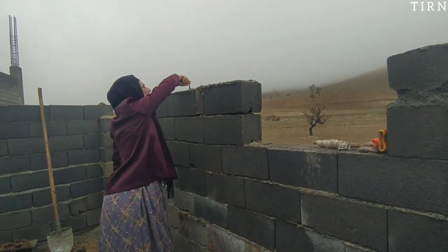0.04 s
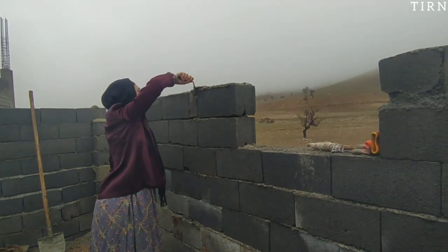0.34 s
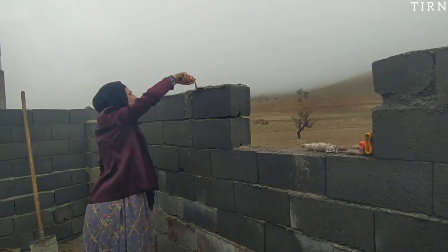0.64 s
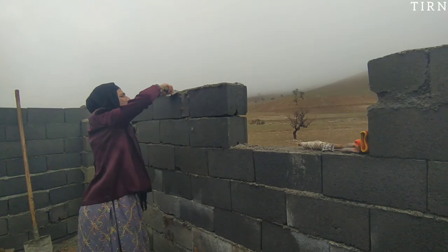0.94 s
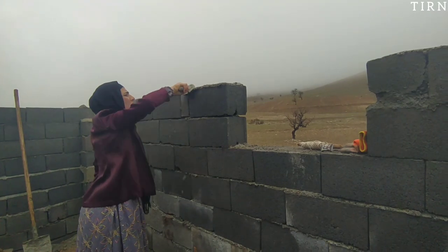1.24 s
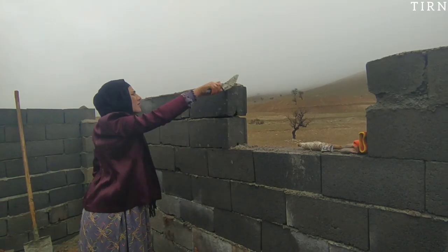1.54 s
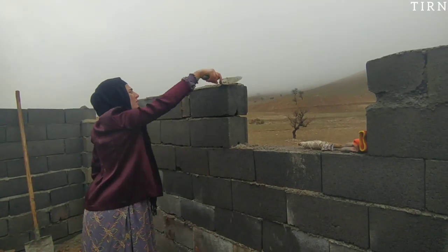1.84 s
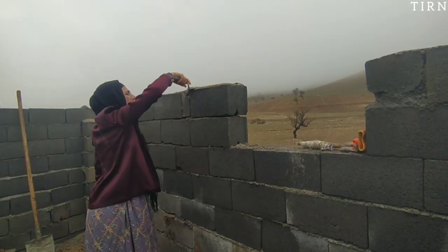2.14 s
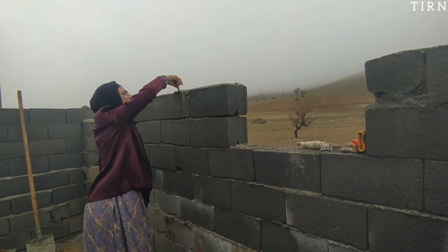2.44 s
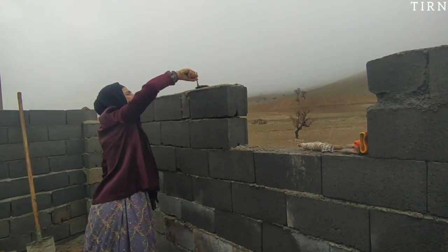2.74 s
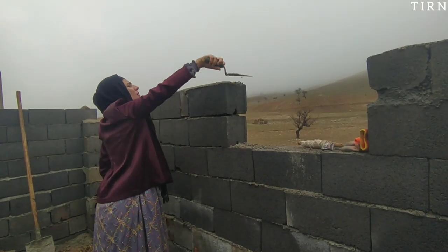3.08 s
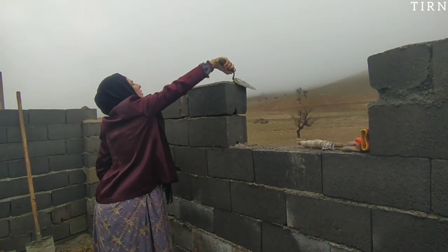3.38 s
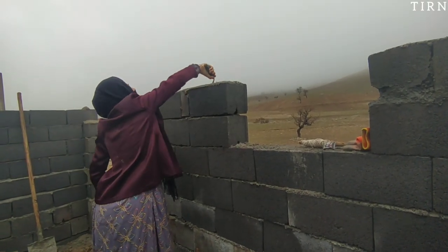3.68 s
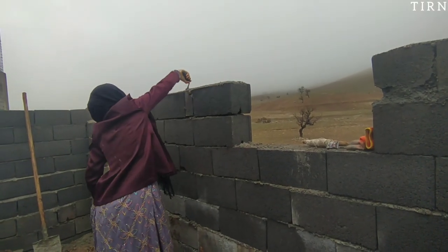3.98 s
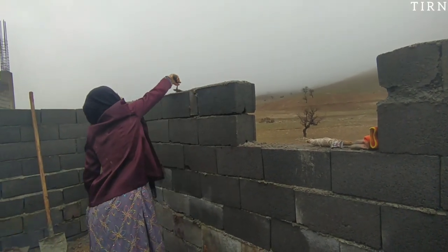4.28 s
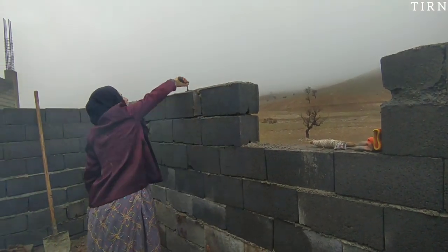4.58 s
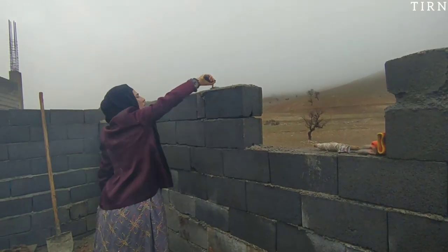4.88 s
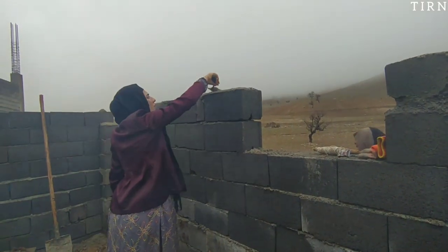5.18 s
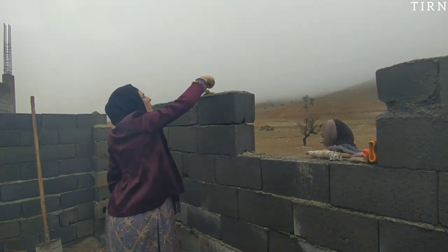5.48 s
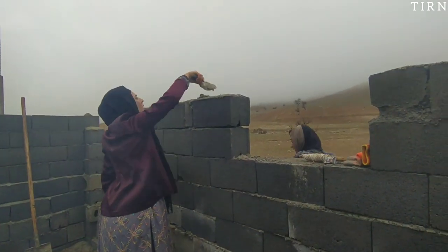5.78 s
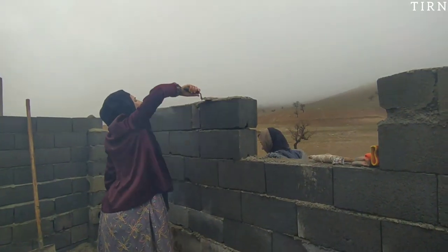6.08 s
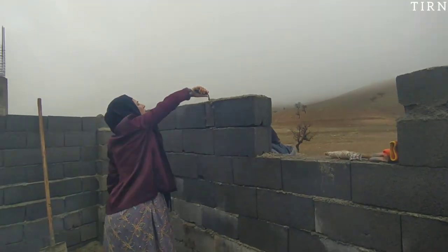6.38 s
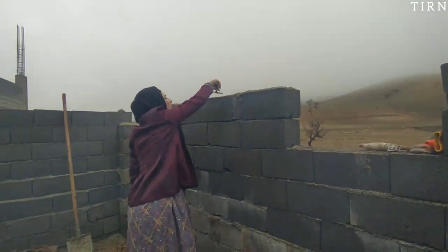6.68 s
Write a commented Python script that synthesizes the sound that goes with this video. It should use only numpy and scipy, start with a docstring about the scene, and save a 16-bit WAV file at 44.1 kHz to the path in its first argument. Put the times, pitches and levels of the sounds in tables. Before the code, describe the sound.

A steel trowel spreads sandy mortar along a hollow concrete block wall in short, hissing strokes. After about a second the blade hits bare block, rasping, catching and ringing as grit cracks. Mostly gentler strokes follow, a lump of mortar patters softly down, and the scraping resumes. The trowel sits to the left, with a brief wall echo, over faint open air and a distant engine.

```python
"""A far engine drones while a steel trowel starts to spread sandy mortar along a hollow concrete block wall.
Sand hisses under the blade, and the unroofed walls echo briefly. After about a second the blade bears
on bare block: it rasps, catches and rings, grit cracks, and the block grinds below.
Mostly gentler strokes follow. Just past five seconds a lump of mortar patters to the ground,
and a few more strokes end the scene."""
import sys
import numpy as np
from scipy import signal
from scipy.fft import rfft, irfft, next_fast_len
from scipy.io import wavfile
from scipy.ndimage import map_coordinates

SR = 44100
rng = np.random.default_rng(int(sys.argv[2]) if len(sys.argv) > 2 else 0)


def to_wav(sig):
    """Store sig (one row per channel, or 1-D mono) as 16-bit WAV at the path in sys.argv[1].

    Samples outside -1..1 are clipped; the rate is SR.
    """
    pcm = np.clip(np.atleast_2d(sig), -1, 1) * 32767
    pcm = np.round(pcm).astype(np.int16)
    wavfile.write(sys.argv[1], SR, pcm.T)  # frames by channels


N = 296336
T = np.arange(N) / SR

# Tone of the open air. Every spectrum gives only a shape: pitch_hz, level_db
AIR_SPECTRUM = [(12, -60), (20, 8.5), (54, -9.5), (72, -2), (97, -12), (223, -11.5), (347, -18.5),
                (1210, -23.5), (2100, -27), (3760, -24.5), (7720, -38.5), (13800, -36), (15000, -40)]
# How long the walls' echo takes to fade by 60 dB: pitch_hz, fade_s
WALL_FADE = [(200, 0.17), (2000, 0.23), (10000, 0.18)]
# How much louder the left side is than the right: pitch_hz, extra_db
LEFT_EXTRA = [(200, 1.5), (700, 1.5), (1000, -1), (1300, 8), (2400, 8.5), (3700, 3.5), (5500, 9.5),
              (7800, 14), (10000, 9.5), (14000, 1)]
# Pieces of wet mortar landing: start_s, level_db, decay_s
MORTAR_PIECES = [(5.34, -50, 0.0038), (5.353, -50, 0.0056), (5.366, -53, 0.023), (5.412, -66, 0.05),
                 (5.7, -54, 0.0024)]
# Their dull thud: pitch_hz, level_db
THUD_SPECTRUM = [(50, -17), (110, -17), (215, 5.5), (330, 5), (450, -1), (590, 10), (700, 5), (820, -24),
                 (1040, 0), (1400, -33), (5000, -45)]
# Hiss of the sand: pitch_hz, level_db
SAND_SPECTRUM = [(600, -60.5), (1500, -17.5), (3000, -8), (3700, -8), (4500, -4.5), (5500, -6),
                 (7300, -3.5), (8500, -4.5), (10000, -14.5), (12000, -19), (15000, -26)]
# Grinding of the hollow block: pitch_hz, level_db
BLOCK_SPECTRUM = [(60, -23), (115, -9), (220, 2), (350, -4), (520, 1), (750, 1.5), (1000, 5.5), (1600, 1),
                  (4000, -69)]
# Broad rasp of the blade: pitch_hz, level_db
RASP_SPECTRUM = [(400, -23.5), (900, -5), (1300, -2.5), (1900, 0.5), (2350, 4), (2800, 0.5), (3400, -2),
                 (6000, -32)]
# The blade's own notes (modes), damped by hand and mortar: pitch_hz, width_hz, level_db
BLADE_NOTES = [(940, 16, 10), (1162, 65, 3), (1398, 38, 0.5), (1434, 75, -4), (1659, 114, 8),
               (1729, 93, 7.5), (2070, 72, -2.5), (2064, 49, -6), (2365, 52, -4.5), (2597, 72, 5.5)]
# Single grains cracking under the edge: start_s, tick_db, pitch_hz, knock_db
GRIT_CRACKS = [(.897, -32, 7500, -40), (.907, -29, 7000, -42), (0.9657, -17.5, 4230, -14),
               (1.0495, -20, 8500, -47), (1.0583, -15.5, 8850, -55), (1.41, -23, 7150, -7),
               (1.4742, -30, 2180, -1.5), (1.826, -28, 9600, -52), (1.916, -24, 9000, -52),
               (2.164, -19, 7500, -40), (2.547, -26, 8000, -33), (3.3558, -29, 6040, -65),
               (3.3594, -23, 6860, -60), (3.423, -35, 2480, -35), (3.4352, -35, 6900, -21),
               (3.918, -20.5, 4470, -37), (4.741, -30, 7000, -25), (5.552, -33, 7800, -62),
               (5.758, -34.5, 7850, -36)]
# The blade catches on the block and judders: start_s, steel_db, sand_db, block_db, length_s, favoured_hz
BLADE_CATCHES = [(0.232, -45.5, -57, -50, .012, 2360), (0.424, -43, -55, -66, 0.045, 2230),
                 (0.724, -53, -64, -54, 0.016, 2360), (.932, -45, -62, -47, 0.011, 1700),
                 (.958, -41.5, -50, -43.5, 0.022, 1300), (1.138, -44, -52, -70, .021, 1550),
                 (1.234, -34.5, -45.5, -50.5, 0.038, 1680), (1.344, -33, -41, -44, 0.015, 1700),
                 (1.37, -28, -38, -49, 0.016, 1720), (1.406, -24.5, -31.5, -54, 0.0096, 2100),
                 (1.426, -28, -39, -56, 0.01, 2120), (1.464, -28.5, -58, -48, 0.0096, 1950),
                 (1.511, -31.5, -52, -49, 0.016, 2100), (1.595, -31.5, -44, -63, 0.0081, 2220),
                 (1.671, -42.5, -49.5, -50.5, 0.014, 1930), (1.934, -46, -65, -46, 0.021, 1500),
                 (2.889, -43, -46, -61, 0.084, 2400), (3.046, -58, -38.5, -60, 0.023, 2300),
                 (3.421, -37, -42.5, -39.5, 0.012, 2430), (3.432, -32.5, -31.5, -39.5, 0.0071, 2180),
                 (3.757, -36.5, -46.5, -73, 0.024, 2365), (3.792, -39.5, -58, -65, .018, 2365),
                 (3.841, -39.5, -56, -50, .028, 2360), (3.906, -38.5, -44.5, -45, .016, 2365),
                 (4.773, -46.5, -66, -64, 0.061, 2150), (5.035, -59, -52, -51, 0.015, 1500),
                 (5.173, -51, -74, -69, .03, 2530), (5.954, -55, -53, -76, .025, 1950)]
# Trowel strokes: start_s, rise_s, hold_s, fall_s, sand_db, steel_db, block_db, swell_db (over the hold),
# favoured_hz, spread_octaves, ringing_share (0-1). The last three, the "contact", pick the notes that ring.
TROWEL_STROKES = [(0.061, .28, .12, .2, -45, -45.5, -64, 3, 2320, 0.16, 0.43),
                  (0.682, 0.093, .13, 0.052, -45.5, -51, -67, 5, 2130, .6, 0),
                  (0.952, 0.018, 0.022, 0.09, -48, -45.5, -55.5, -2, 1600, 0.65, 0),
                  (1.118, 0.064, .13, 0.056, -50.5, -42, -53, 1.5, 1580, .27, 0.86),
                  (1.313, 0.037, .24, .05, -41.5, -36.5, -47.5, -3.5, 1640, 0.53, 0.64),
                  (1.618, .03, .025, 0.087, -56, -56, -63, -1.5, 2200, .4, .33),
                  (1.766, 0.038, 0.054, 0.08, -61, -62, -83, 0, 2130, .4, 0.6),
                  (1.89, 0.09, 0.15, .07, -43, -50.5, -58, 1, 2150, .32, .35),
                  (2.122, 0.052, 0.1, 0.15, -44.5, -45.5, -61, -1.5, 2110, .32, 0.43),
                  (2.383, 0.14, 0.022, 0.13, -55.5, -56, -66, -2, 2150, 0.28, 0.5),
                  (2.648, 0.17, 0.23, 0.018, -40, -47.5, -56, 4, 2250, 0.14, 0.36),
                  (3.434, 0.099, 0.029, 0.037, -49, -47.5, -63, 2, 1780, .54, 0.2),
                  (3.564, 0.069, 0.11, 0.035, -46.5, -53.5, -62.5, 1, 2310, 0.29, 0.54),
                  (3.726, 0.032, 0.16, 0.071, -51.5, -47, -51.5, 1, 2300, 0.46, 0.35),
                  (3.92, 0.084, 0.1, 0.14, -50.5, -56.5, -67, -0.5, 2080, .78, 0),
                  (4.367, 0.052, 0.081, .04, -56, -59, -71, -1, 2100, .5, 0.36),
                  (4.484, 0.049, 0.25, 0.23, -48.5, -54.5, -63, 4, 2180, 0.18, .42),
                  (4.926, 0.069, 0.032, 0.11, -52.5, -46, -57, -3.5, 1700, .86, 0.15),
                  (5.076, 0.053, 0.21, 0.14, -63, -62, -83, 2, 2400, 0.28, 0.17),
                  (5.52, 0.03, 0.026, 0.028, -62.5, -81, -80, 3, 2100, .3, 0.8),
                  (5.918, 0.044, 0.0092, 0.034, -55.5, -49.5, -70, 5.5, 1920, 0.17, 0.68),
                  (5.988, 0.05, 0.21, .05, -54.5, -57, -70, 3, 2200, 0.65, 0.07),
                  (6.143, .16, 0.12, 0.056, -41, -47, -61.5, 2.5, 2200, 0.47, 0.3),
                  (6.401, 0.053, 0.2, 0.07, -45, -47, -58.5, 0.5, 2260, 0.51, 0.47)]

RISE_CURVE, FALL_CURVE = 0.84, 1.17  # powers that bend the press and the lift
LIGHT_TOUCH_DB = (-70.5, -69.5, -74.5)  # sand, steel, block: the blade barely brushes between strokes
CATCH_OCTAVES, CATCH_SHARE = 0.063, 0.74  # a caught blade rings strongly on few notes
SLIP_DEPTH, SLIP_RINGING = 0.53, .8  # stick and slip on wet mortar, and what a fully ringing blade adds


def amp(db):
    """Turns decibels into a gain."""
    return 10 ** (np.asarray(db) / 20)


def unit(x):
    """Scales x to an average (rms) level of 1."""
    return x / np.sqrt(np.mean(x ** 2) + 1e-20)


def along(points, hz):
    """Reads between the rows of a (pitch_hz, value) table, on a log pitch scale."""
    pitches, values = np.transpose(points)
    return np.interp(np.log(hz + 1), np.log(pitches + 1), values)


def wobble(rate):
    """A smooth random curve through `rate` points a second."""
    return map_coordinates(rng.standard_normal(int(N * rate / SR) + 4), [T * rate])


def filtered(x, response):
    """Multiplies each frequency in x by response(hz)."""
    size = next_fast_len(N + SR // 2)
    return irfft(rfft(x, size) * response(np.fft.rfftfreq(size, 1 / SR)), size)[..., :N]


def coloured(x, spectrum, size=4096):
    """Gives x the tone of a spectrum, with a filter that rings only after each hit."""
    cepstrum = irfft(np.log(amp(along(spectrum, np.fft.rfftfreq(size, 1 / SR)))))
    cepstrum[1:size // 2] *= 2
    cepstrum[size // 2 + 1:] = 0
    ring = irfft(np.exp(rfft(cepstrum)))
    return signal.fftconvolve(x, ring / np.linalg.norm(ring))[:N]


def far_engine(level_db=-59, pitch_hz=43.1):
    """A far engine drones on one low note that wavers in level and pitch."""
    waver = amp(1.3 * wobble(16))
    phase = 2 * np.pi * pitch_hz * T + .5 * wobble(2.61) + 0.19 * wobble(17)
    return amp(level_db) * waver * np.sqrt(2) * np.sin(phase)


def open_air(gain_db=-65, bass_width=0.54):
    """Faint open air, whose low rumble swells and sinks many times a second."""
    mid, side = [coloured(rng.standard_normal(N), AIR_SPECTRUM) for _ in range(2)]
    rumble = filtered(mid, lambda hz: 1 / (1 + (hz / 300) ** 4))
    stir = rumble * (amp(3.75 * wobble(28)) - 1)
    side = filtered(side, lambda hz: bass_width + (1 - bass_width) * hz / (hz + 700))
    return amp(gain_db) * (stir + np.array([mid + side, mid - side]))


def wall_echo():
    """A short, blurred echo from the block walls, different on each side."""
    hz, t, noise = signal.stft(rng.standard_normal((2, SR // 4)), SR, nperseg=256)
    fade = amp(-60 * t / along(WALL_FADE, hz)[:, None])
    tail = signal.istft(noise * fade, SR, nperseg=256)[1]
    return np.pad(tail / np.linalg.norm(tail[0]), ((0, 0), (SR // 300, 0)))


def near_scatter(decay_s=0.0053):
    """Sound scatters off the nearest rough faces for a few milliseconds."""
    t = np.arange(SR // 20) / SR
    scatter = np.exp(-t / decay_s) * rng.standard_normal((1, len(t)))
    return scatter / np.linalg.norm(scatter)


def drifting(x, make_echo, rate, count):
    """Random echo patterns blend into one another, as when the trowel travels along the wall."""
    weights = np.array([wobble(rate) for _ in range(count)])
    weights /= np.linalg.norm(weights, axis=0)
    return sum(w * signal.oaconvolve(x[None], make_echo(), axes=1)[:, :N] for w in weights)


def in_stereo(x, wall_db=-8, direct_share=0.07, split_hz=750, left_delay_s=.00043):
    """The left side faces the trowel; the right gets its treble mostly scattered. Both share the bass."""
    left = filtered(x, lambda hz: np.exp(-2j * np.pi * hz * left_delay_s))
    scattered = drifting(x, near_scatter, rate=30, count=5)[0]
    shaded = np.sqrt(direct_share) * x + np.sqrt(1 - direct_share) * scattered
    left, shaded = np.array([left, shaded]) + amp(wall_db) * drifting(x, wall_echo, rate=8, count=3)
    bass = lambda hz: 1 / np.sqrt(1 + (hz / split_hz) ** 4)
    right = filtered(left, bass) + filtered(shaded, lambda hz: np.sqrt(1 - bass(hz) ** 2))
    lean = np.array([[.5], [-.5]])  # left goes up by half, right down by half
    return filtered(np.array([left, right]), lambda hz: amp(lean * along(LEFT_EXTRA, hz)))


def burst(start_s, hold_s, decay_s):
    """The level of a touch that holds and then lets go."""
    envelope, age = np.zeros(N), np.arange(SR // 4) / SR
    envelope[round(start_s * SR):][:len(age)] = np.exp(-np.maximum(age - hold_s, 0) / decay_s)
    return envelope


def falling_mortar():
    """Wet lumps land with a dull patter."""
    landings = sum(amp(db) * burst(start_s, 0, decay_s) for start_s, db, decay_s in MORTAR_PIECES)
    return coloured(landings * rng.standard_normal(N), THUD_SPECTRUM)


def cracking_grit(crumble_db=-17, crumble_s=0.0024, cycles=1.45, dull_hz=9500):
    """Each grain snaps, rings for a cycle or so and crumbles; the snap also knocks the steel."""
    ticks, knocks = np.zeros((2, N))
    t = np.arange(SR // 20) / SR
    for start_s, tick_db, hz, knock_db in GRIT_CRACKS:
        snap = (t == 0) + amp(crumble_db) * np.exp(-t / crumble_s) * rng.standard_normal(len(t))
        snap /= np.linalg.norm(snap)
        ping = np.exp(-t * hz / cycles) * np.sin(2 * np.pi * hz * t)
        ping = np.gradient(ping) * SR / (2 * np.pi * hz)  # thins out the bass
        start = round(start_s * SR)
        ticks[start:][:len(t)] += amp(tick_db) * signal.fftconvolve(snap, ping)[:len(t)]
        knocks[start:][:len(t)] += amp(knock_db) * snap
    return filtered(ticks, lambda hz: 1 / np.sqrt(1 + (hz / dull_hz) ** 10)), knocks


def grains(rate, spread_db, smooth):
    """About `rate` uneven little hits a second, in brief clumps, over smooth rubbing noise."""
    hits = (rng.random(N) < rate / SR) * rng.choice([-1, 1], N)
    sizes = amp(spread_db * np.minimum(rng.standard_normal(N), 2))
    clumps = amp(1.3 * wobble(500))
    return unit(clumps * (unit(hits * sizes) + smooth * rng.standard_normal(N)))


def steel_blade(force, favoured_hz, spread_octaves, ringing_share):
    """The blade rings most on notes near the favoured pitch, over a broad rasp damped by mortar."""
    t = np.arange(SR // 10) / SR
    share = np.clip(ringing_share, 0, 1)
    gains = np.array([amp(db) / np.hypot(1, (np.log2(hz / favoured_hz) / spread_octaves) ** 2)
                      for hz, _, db in BLADE_NOTES])
    gains *= np.sqrt(share) / np.linalg.norm(gains, axis=0)
    ring = 0
    for k, (hz, width_hz, _) in enumerate(BLADE_NOTES):
        note = (-1) ** k * np.exp(-np.pi * width_hz * t) * np.sin(2 * np.pi * hz * t)
        ring += signal.oaconvolve(gains[k] * force, note / np.linalg.norm(note))[:N]
    return ring + coloured(np.sqrt(1 - share) * force, RASP_SPECTRUM)


def hand_strokes():
    """Each stroke presses in, holds and lifts. Gives sand, steel and block gains, and the contact."""
    power = np.outer(amp(LIGHT_TOUCH_DB) ** 2, np.ones(N))
    contact, weight = np.zeros((3, N)), np.zeros(N)
    for start_s, rise_s, hold_s, fall_s, *levels_db, swell_db, hz, spread, share in TROWEL_STROKES:
        held_s = T - start_s - rise_s
        rise = np.clip(1 + held_s / rise_s, 0, 1) ** RISE_CURVE
        fall = np.clip(1 - (held_s - hold_s) / fall_s, 0, 1) ** FALL_CURVE
        swell = amp(swell_db * (np.clip(held_s / hold_s, 0, 1) - .5))
        press = rise * fall * swell
        power += np.outer(amp(levels_db), press) ** 2
        # where strokes overlap, the contact slides from one to the next
        contact += np.outer([hz, spread, share], press + 1e-6)
        weight += press + 1e-6
    return np.sqrt(power), contact / weight


def trowel(rasp_gain_db=-2.5, grind_gain_db=-2.5, catch_gain_db=-1.5):
    """Sand drives the hiss, blade and block; the drag sticks and slips, hardest where the steel rings."""
    (hiss, rasp, grind), contact = hand_strokes()
    ringing_share = contact[2]
    slip = (SLIP_DEPTH + SLIP_RINGING * ringing_share) * (wobble(110) + 0.53 * wobble(30))
    on_sand = hiss * amp(.85 * slip) * grains(rate=3200, spread_db=4.2, smooth=.85)
    on_steel = rasp * amp(rasp_gain_db + 1.4 * slip) * grains(rate=1400, spread_db=4, smooth=.65)
    on_block = grind * amp(grind_gain_db + 1.77 * slip) * grains(rate=500, spread_db=4, smooth=0.53)
    # a catch shakes all three together, and pulls the contact to where the edge is caught
    chatter = amp(catch_gain_db) * rng.standard_normal(N)
    for start_s, steel_db, sand_db, block_db, length_s, hz in BLADE_CATCHES:
        grip = burst(start_s, length_s / 2, length_s / 2)
        on_steel += amp(steel_db) * grip * chatter
        on_sand += amp(sand_db) * grip * chatter
        on_block += amp(block_db) * grip * chatter
        pull = 1 - 1 / (1 + (amp(steel_db) * grip / rasp) ** 2)
        contact += pull * (np.array([[hz], [CATCH_OCTAVES], [CATCH_SHARE]]) - contact)
    ticks, knocks = cracking_grit()
    blade = steel_blade(on_steel + knocks, *contact)
    return ticks + coloured(on_sand, SAND_SPECTRUM) + blade + coloured(on_block, BLOCK_SPECTRUM)


def scene():
    """Trowel and mortar between the walls, over the engine and the air."""
    return in_stereo(trowel() + falling_mortar()) + far_engine() + open_air()


def record(dry, top_hz=15500):
    """Cuts away the very highest treble."""
    return filtered(dry, lambda hz: 1 / (1 + (hz / top_hz) ** 80))


dry = scene()
out = record(dry)
to_wav(out)
```